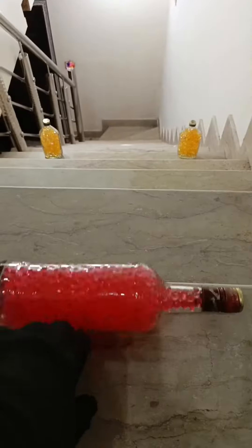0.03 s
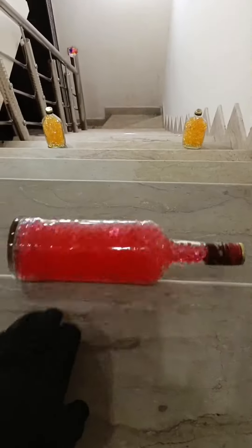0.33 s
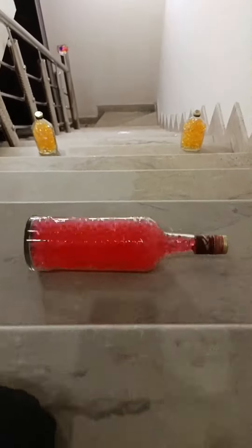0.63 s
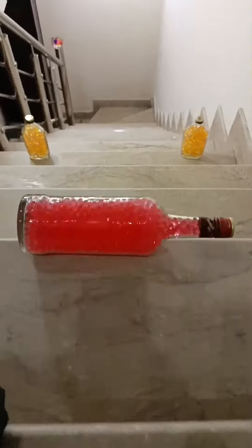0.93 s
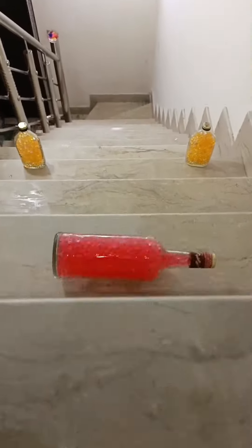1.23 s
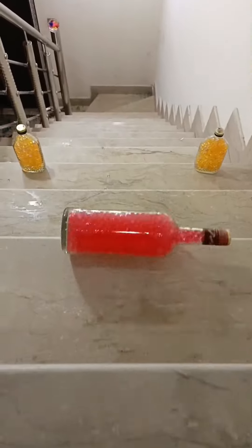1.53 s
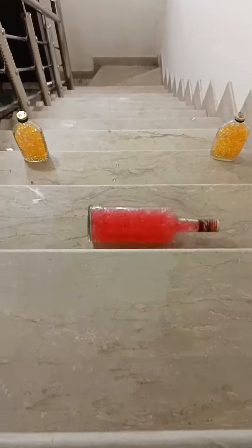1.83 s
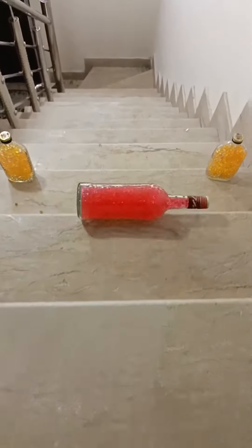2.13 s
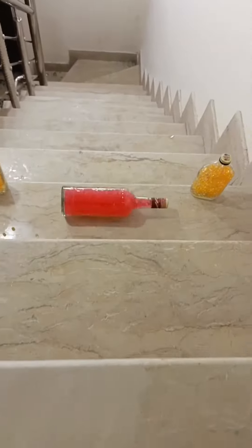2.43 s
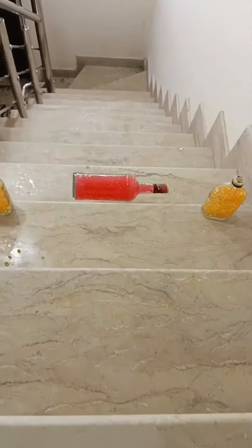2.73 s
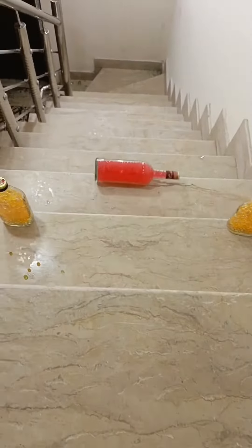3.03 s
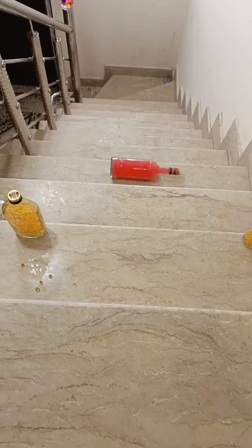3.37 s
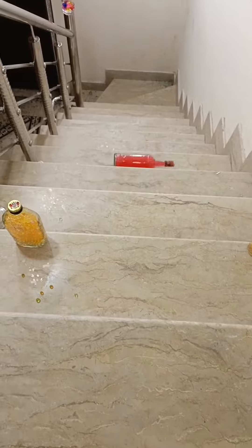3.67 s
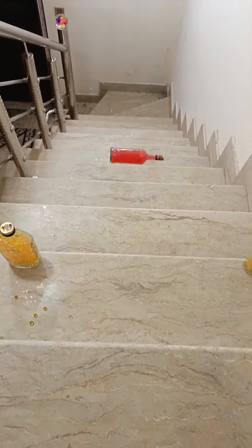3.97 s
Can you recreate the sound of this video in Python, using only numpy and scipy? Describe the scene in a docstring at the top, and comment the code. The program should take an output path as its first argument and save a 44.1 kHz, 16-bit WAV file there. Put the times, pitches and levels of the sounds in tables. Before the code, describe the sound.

A glass bottle full of beads rolls softly, then drops down stone steps one at a time. Seven sharp clanks echo in the stairwell, each with a brief rattle, with quieter rolling and clinking between the early ones.

```python
"""In an echoing stairwell, a glass bottle full of beads is nudged off a stone step and drops step by step.
Each landing cracks on the stone, thumps the stairs and shakes the beads, which hiss and ring the glass
but also keep its ring short. Before the first drop and between the early ones the bottle rolls, knocks
and clinks. A limiter dips the level just before each loud blow, and a slower control evens out the echo."""
import sys
import numpy as np
from scipy import signal
from scipy.fft import rfft, irfft
from scipy.io import wavfile
from scipy.ndimage import uniform_filter1d, minimum_filter1d

SR = 44100
rng = np.random.default_rng(int(sys.argv[2]) if len(sys.argv) > 2 else 0)


def bounce(signal):
    """Save signal as a 16-bit WAV file at the path given by the first command-line argument."""
    frames = np.transpose(np.atleast_2d(signal))
    limited = np.clip(frames, -1, 1)
    pcm = np.round(limited * 32767).astype(np.int16)
    wavfile.write(sys.argv[1], SR, pcm)


N = 176400

# Levels in the tables are relative. A spectrum says how strong a sound is at each pitch.
# Spectrum of the still air: pitch_hz, level_db
AIR_SPECTRUM = [(25, -11), (60, -9), (95, -11.5), (160, -35), (400, -18), (1500, -32), (5000, -30),
                (9000, -44.5), (16000, -49)]
# Time the echo takes to fade by 60 dB: pitch_hz, fade_s
ECHO_FADE = [(100, 1.3), (300, 0.93), (1000, 0.76), (2700, 0.72), (6500, 0.6), (15000, 0.32)]
# Loudness of the roll on the top step: time_s, level_db
TOP_ROLL = [(0, -50), (.1, -46.5), (.2, -40), (.28, -47), (.36, -57.5), (.42, -56), (.5, -65)]
# Spectrum of glass rolling on stone: pitch_hz, level_db
ROLL_SPECTRUM = [(100, -47.5), (300, -17.5), (450, 4), (720, 4.5), (1100, -9), (2000, -19), (6000, -62),
                 (16000, -71)]
# Rolls across the lower steps: middle_s, length_s, grind_db, rattle_db, hollow_hz
STEP_ROLLS = [(0.72, 0.15, -28.5, -39, 900), (1.424, 0.19, -17.5, -29, 680),
              (2.043, 0.25, -18.5, -31.5, 330), (2.558, 0.19, -11.5, -31, 620)]
# Spectrum of beads tumbling inside the bottle: pitch_hz, level_db
RATTLE_SPECTRUM = [(200, -14), (900, -0.5), (1800, -16), (2750, -3), (4000, 0), (6800, -14), (7800, -43),
                   (9400, -13.5), (11000, -48), (15300, -25), (16500, -36)]
# Bumps of the rolling bottle: start_s, clack_db, thud_db
KNOCKS = [(0.0215, -46.5, -35), (0.078, -67, -5.5), (0.1238, -40.5, 1), (0.1495, -34, -9), (0.189, -66, 0),
          (0.205, -58, -3.5), (0.745, -21, 6), (0.805, -19, 8), (0.84, -25, -1), (0.891, -34, 3)]
# Beads tapping the glass: start_s, level_db
CLINKS = [(0.019, -37.5), (0.132, -40), (0.137, -42), (0.1443, -35), (0.207, -44), (0.218, -44),
          (0.2532, -42), (0.265, -43.5), (0.701, -29), (0.779, -27.5), (0.86, -31.5), (0.917, -36.5),
          (1.41, -33), (1.475, -26), (1.489, -22.5), (1.553, -32)]
# Ringing tones of the glass, damped by the beads (wider dies sooner): pitch_hz, width_hz, level_db
GLASS_TONES = [(2622, 73, -2), (2715, 99, 1.5), (2763, 65, -6), (5200, 205, -16.5), (6540, 220, -12),
               (6806, 204, -11.5), (8230, 150, -32.5), (9140, 290, -39.5), (10100, 100, -42),
               (12400, 270, -44), (13200, 260, -39.5), (14100, 300, -43.5), (14570, 320, -34),
               (14800, 260, -28)]
# Spectrum of beads hitting each other: pitch_hz, level_db
BEAD_SPECTRUM = [(100, -26.5), (600, -3), (1500, 3), (3200, -1.5), (4500, -5), (6800, -24.5), (7800, -32),
                 (11000, -59), (15300, -26.5), (16500, -59)]
# Spectrum of a blow on stone: pitch_hz, level_db
BLOW_SPECTRUM = [(30, -40), (70, -22.5), (120, -18.5), (200, -14.5), (400, -5), (900, 1), (1700, 2.5),
                 (3000, -5.5), (4500, -18.5), (6800, -18), (8000, -40), (11000, -57.5), (16000, -39)]
# Spectrum of the booming stairs: pitch_hz, level_db
BOOM_SPECTRUM = [(30, -31), (65, -12.5), (100, 0), (140, 2), (190, -15), (400, -34.5), (2000, -63)]
# The bottle hitting each step: start_s, level_db, hollow_db, hiss_db, low_ring_db, overtone_db,
# high_ring_db, sparkle_db, low_ring_hz, overtone_hz, direct_db, thump_db, hollow_hz
LANDINGS = [(0.4497, 0.5, 1.5, -5, -3, 4, 2.5, 1.5, 2743, 5070, 8.5, 1, 830),
            (1.1751, 1, 4.5, -4, -0.5, 1, -4, 1.5, 2730, 5150, 9.5, 1.5, 650),
            (1.8036, 4.5, 8.5, -0.5, -5, -5, -3.5, 0, 2714, 5060, 7.5, -15, 380),
            (2.335, 3, 0.5, 1, 1.5, 1.5, -1, 3.5, 2779, 5200, 3.5, -21, 420),
            (2.8186, 0.5, -5, 0, 4.5, 2.5, 4.5, 3.5, 2694, 5200, 5.5, -21, 400),
            (3.284, 2.5, -5, 0.5, 5, -3, -2, 1.5, 2765, 5270, 3.5, -26, 520),
            (3.6923, 3, -8, -13, 2, -1.5, -10, -3, 2696, 5110, 1, -27, 400)]

GROUP_EDGES_HZ = [4000, 6000, 8800]  # split the glass tones into low ring, overtone, high ring, sparkle
RATTLE_GROUPS_DB, CLINK_GROUPS_DB = (7.5, 7, 3, 20.5), (-5.5, 6.5, -0.5, 13.5)  # one level per group
LOW_RING_HZ, OVERTONE_HZ = 2720, 5200  # usual pitches of the two lowest groups


def gain(db):
    """Turn decibels into a number to multiply by."""
    return 10 ** (np.asarray(db) / 20)


def unit_energy(x):
    """Scale a sound so that its squared samples add up to 1."""
    return x / np.sqrt(np.sum(x ** 2) + 1e-18)


def look_up(table, hz):
    """Read a table at any pitch, sliding between its rows."""
    pitches, values = np.array(table).T
    return np.interp(np.log(hz + 1), np.log(pitches), values)


def colour(x, spectrum, hollow_db=0, hollow_hz=1000, hollow_octaves=0.61, size=4096):
    """Filter a sound to a spectrum; a broad boost around one pitch can make it sound hollow."""
    hz = np.arange(size // 2 + 1) * SR / size
    boost_db = hollow_db * np.exp(-.5 * (np.log2((hz + 1) / hollow_hz) / hollow_octaves) ** 2)
    cepstrum = irfft(np.log(gain(look_up(spectrum, hz) + boost_db)))
    cepstrum[1:size // 2] *= 2  # folding it forward keeps the filter from ringing before a hit
    cepstrum[size // 2 + 1:] = 0
    return signal.fftconvolve(x, irfft(np.exp(rfft(cepstrum))))[:len(x)]


def pass_band(x, side, hz):
    """Let through the "low" or the "high" side of a pitch."""
    return signal.sosfilt(signal.butter(2, hz, side, fs=SR, output="sos"), x)


def add(out, start_s, x):
    """Mix a sound in at a given time."""
    i = int(start_s * SR)
    out[i:i + len(x)] += x[:len(out) - i]


def burst(samples, fade_s):
    """Noise that starts at once and dies away."""
    return rng.standard_normal(samples) * np.exp(-np.arange(samples) / SR / fade_s)


def steady_noise(spectrum, **hollow):
    """Even noise with the given spectrum and an average power of 1."""
    return unit_energy(colour(rng.standard_normal(N), spectrum, **hollow)) * np.sqrt(N)


def air():
    """The faint hush of the stairwell."""
    return gain(-55.5) * steady_noise(AIR_SPECTRUM)


def crack(t):
    """The direct sound, plus a quick slap of echoes between the bottle and the faces of the step."""
    slap = pass_band(burst(len(t), fade_s=0.0016), "high", hz=770)
    return unit_energy((t == 0) + 2.2 * unit_energy(slap))


def stairwell(direct_db, bands=14, tail_rise_s=0.0054, wall_delay_s=0.0074, wall_fade_s=0.036):
    """How the stairwell answers a click: a crack, echoes off near walls, then a tail that grows dull."""
    t = np.arange(SR * 3 // 2) / SR
    noise = rfft(rng.standard_normal(len(t)))
    hz = np.linspace(1, SR / 2, len(noise))
    centres_hz = np.geomspace(80, 16000, bands)
    tail = np.zeros(len(t))
    for centre_hz, weights in zip(centres_hz, np.eye(bands)):
        band = irfft(noise * np.interp(np.log(hz), np.log(centres_hz), weights))
        tail += band * gain(-60 * t / look_up(ECHO_FADE, centre_hz))
    tail *= 1 - np.exp(-t / tail_rise_s)
    echoes = rng.standard_normal(len(t))
    spikes = np.sign(echoes) * np.abs(echoes) ** 2.4  # a few echoes stand out
    walls = spikes * (t > wall_delay_s) * np.exp(-t / wall_fade_s)
    return gain(6) * unit_energy(tail) + gain(9) * unit_energy(walls) + gain(direct_db) * crack(t)


def with_echo(x, direct_db):
    """Play a sound in the stairwell; a higher direct_db makes it seem closer."""
    return signal.fftconvolve(x, unit_energy(stairwell(direct_db)))[:N]


def grind(hollow_hz, wobble_db=3.5, wobbles_per_s=28):
    """Glass rolling on stone hums around one hollow pitch, louder and softer as the contact wobbles."""
    wobble = np.interp(np.arange(N) / SR * wobbles_per_s, np.arange(SR), rng.standard_normal(SR))
    return steady_noise(ROLL_SPECTRUM, hollow_db=8, hollow_hz=hollow_hz) * gain(wobble_db * wobble)


def top_roll():
    """The bottle grinds softly across the top step."""
    times_s, levels_db = np.array(TOP_ROLL).T
    return grind(hollow_hz=680) * gain(np.interp(np.arange(N) / SR, times_s, levels_db))


def glass_tone(x, hz, width_hz):
    """Tapped glass rings briefly at one of its own pitches."""
    peak = signal.iirpeak(hz, hz / width_hz, SR)
    return signal.lfilter(*peak, signal.lfilter(*peak, x))


def rattle(ticks_per_s=450, tick_s=0.001):
    """Single tumbling beads tick at random and ring the glass."""
    hits = rng.random(N) < ticks_per_s / SR
    strengths = gain(7 * np.minimum(rng.exponential(size=N), 2))
    fades = signal.lfilter([1], [1, -np.exp(-1 / (tick_s * SR))], hits * strengths)
    ticks = fades * rng.standard_normal(N)
    ring = np.zeros(N)
    for hz, width_hz, level_db in GLASS_TONES:
        group = np.searchsorted(GROUP_EDGES_HZ, hz)
        ring += gain(level_db + RATTLE_GROUPS_DB[group]) * glass_tone(ticks, hz, width_hz)
    return unit_energy(colour(ticks, RATTLE_SPECTRUM) + gain(5) * ring) * np.sqrt(N)


def step_rolls():
    """Between landings the bottle grinds over the stone while its beads rattle."""
    out, t = np.zeros(N), np.arange(N) / SR
    beads = rattle()
    for middle_s, length_s, grind_db, rattle_db, hollow_hz in STEP_ROLLS:
        swell = np.exp(-(2 * (t - middle_s) / length_s) ** 2)
        out += swell * (gain(grind_db) * grind(hollow_hz) + gain(rattle_db) * beads)
    return with_echo(out, direct_db=22.5)


def blow(hollow_db, hollow_hz):
    """Glass meets stone in one sharp push."""
    return gain(37.5) * colour(signal.unit_impulse(SR // 4), BLOW_SPECTRUM, hollow_db, hollow_hz)


def knocks():
    """The rolling bottle bumps on the stone: a light, scraping clack over a dull thud."""
    out = np.zeros(N)
    for start_s, clack_db, thud_db in KNOCKS:
        scrape = unit_energy(burst(SR // 16, fade_s=0.004))
        clack = signal.fftconvolve(blow(hollow_db=2.5, hollow_hz=680), scrape)
        thud = unit_energy(colour(burst(SR // 4, fade_s=0.0085), ROLL_SPECTRUM))
        add(out, start_s, gain(clack_db) * clack)
        add(out, start_s, gain(thud_db) * thud)
    return with_echo(out, direct_db=22.5)


def shake(settle_db, rise_s=0.00095, fall_s=0.004, settle_s=0.052):
    """A rush of tiny bead collisions swells, drops and settles."""
    t = np.arange(SR // 4) / SR
    rise = 1 - np.exp(-t / rise_s)
    fall = np.exp(-t / fall_s) + gain(settle_db) * np.exp(-t / settle_s)
    return unit_energy(rng.standard_normal(len(t)) * rise * fall)


def shaken_beads(hiss_db, groups_db, settle_db, low_ring_hz=LOW_RING_HZ, overtone_hz=OVERTONE_HZ):
    """The beads hiss and ring the glass; where they lie shifts its two lowest groups of tones."""
    out = gain(33.5 + hiss_db) * colour(shake(settle_db), BEAD_SPECTRUM)
    clicks = shake(settle_db)
    shifts = (low_ring_hz / LOW_RING_HZ, overtone_hz / OVERTONE_HZ, 1, 1)
    for hz, width_hz, level_db in GLASS_TONES:
        group = np.searchsorted(GROUP_EDGES_HZ, hz)
        ring = unit_energy(glass_tone(clicks, hz * shifts[group], width_hz)) * np.sqrt(width_hz / SR)
        out += gain(50.5 + level_db + groups_db[group]) * ring
    return out


def clinks():
    """A few beads at a time tap the glass; such tiny contacts favour its high, sparkling tones."""
    out = np.zeros(N)
    for start_s, level_db in CLINKS:
        clink = shaken_beads(hiss_db=-13, groups_db=CLINK_GROUPS_DB, settle_db=-35)
        add(out, start_s, gain(level_db) * clink)
    return with_echo(out, direct_db=14)


def step_thump(thump_db, boom_s=1.2):
    """The step takes the weight: a short thump close by, then a low boom that lingers."""
    t = np.arange(SR) / SR
    thump = pass_band(burst(SR, fade_s=0.003), "low", hz=121)
    boom = colour(rng.standard_normal(SR) * gain(-60 * t / boom_s), BOOM_SPECTRUM)
    return gain(23 + thump_db) * unit_energy(thump) + gain(6) * unit_energy(boom)


def landings(settle_db=-19.5):
    """The bottle lands hard: the step thumps, and the blow and the shaken beads echo off the walls."""
    out = np.zeros(N)
    for (start_s, level_db, hollow_db, hiss_db, *groups_db,
         low_ring_hz, overtone_hz, direct_db, thump_db, hollow_hz) in LANDINGS:
        beads = shaken_beads(hiss_db, groups_db, settle_db, low_ring_hz, overtone_hz)
        hit = blow(hollow_db, hollow_hz) + beads
        add(out, start_s, gain(level_db) * step_thump(thump_db))
        add(out, start_s, gain(level_db) * signal.fftconvolve(hit, stairwell(direct_db)))
    return out


def scene():
    """The falling bottle over the quiet air, in one channel."""
    return (landings() + knocks() + clinks() + top_roll() + step_rolls() + air())[None]


def limiter(x, ceiling_db=1.5, recovery_db_per_s=75, look_ahead_s=0.024):
    """Looks ahead, turns the level down before each loud peak and brings it back at a steady rate."""
    recovery_db = recovery_db_per_s * np.arange(N) / SR
    excess_db = np.maximum(20 * np.log10(np.abs(x) + 1e-9) - ceiling_db, 0)
    volume = gain(recovery_db - np.maximum.accumulate(excess_db + recovery_db))
    half = int(look_ahead_s * SR / 2)
    lowest_ahead = minimum_filter1d(volume, 2 * half + 1, origin=-half)
    return x * uniform_filter1d(lowest_ahead, 2 * half + 1, origin=half)


def leveller(x, threshold_db=-21.5, window_s=0.049, lag_s=0.037, strength=0.38):
    """Turns loud stretches down a little late, so each crack gets through and its echo is flattened."""
    t = np.arange(N) / SR
    loudness = np.sqrt(np.abs(uniform_filter1d(x ** 2, int(window_s * SR))) + 1e-12)
    late_loudness = np.interp(t - lag_s, t, loudness)
    return x * np.minimum(gain(threshold_db) / late_loudness, 1) ** strength


def record(dry, overload_db=24, top_hz=15750):
    """The microphone overloads on the nearest cracks; bass cut, level control, clipping, top cut follow."""
    x = gain(overload_db) * np.tanh(dry[0] / gain(overload_db))
    x = pass_band(x, "high", hz=99)
    x = np.clip(leveller(limiter(x)), -1, 1)
    return signal.sosfilt(signal.ellip(8, .2, 80, top_hz, fs=SR, output="sos"), x)[None]


dry = scene()
out = record(dry)
bounce(out)
```